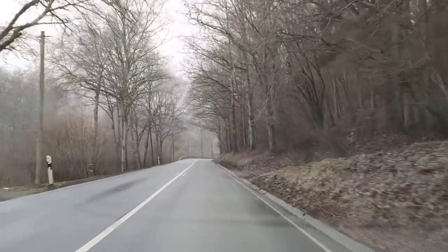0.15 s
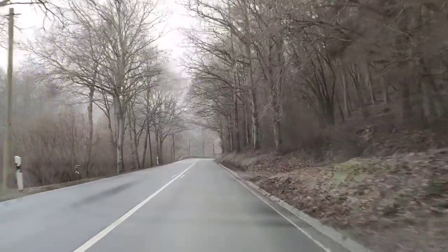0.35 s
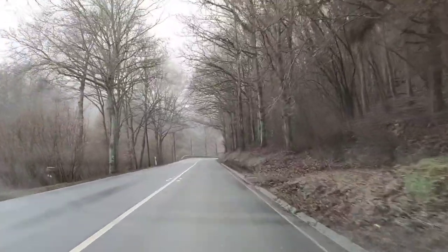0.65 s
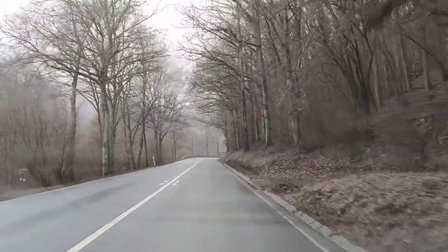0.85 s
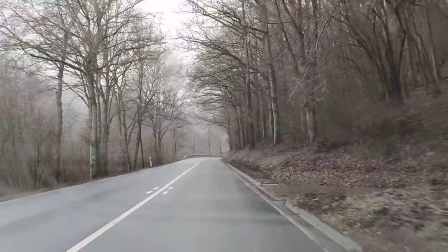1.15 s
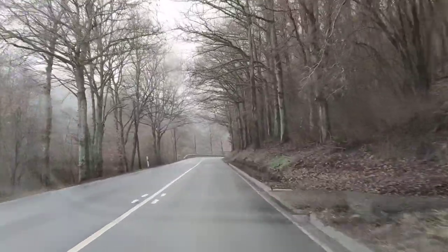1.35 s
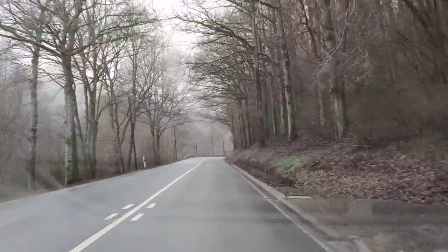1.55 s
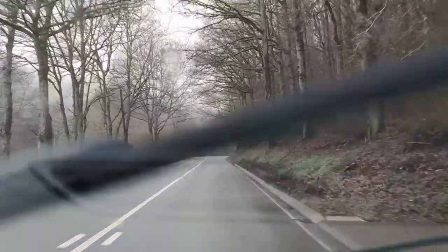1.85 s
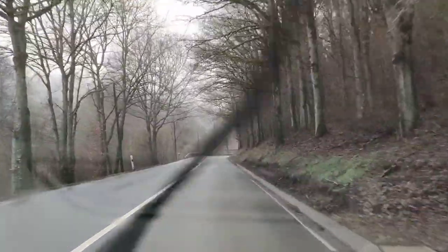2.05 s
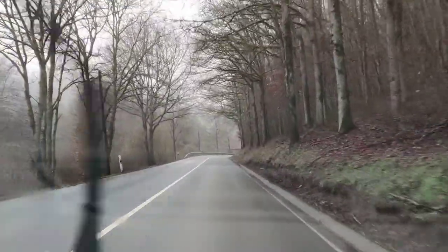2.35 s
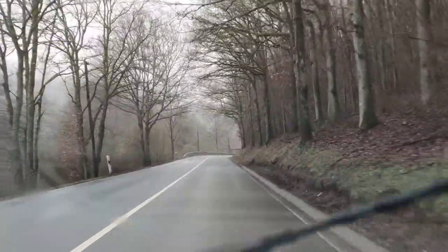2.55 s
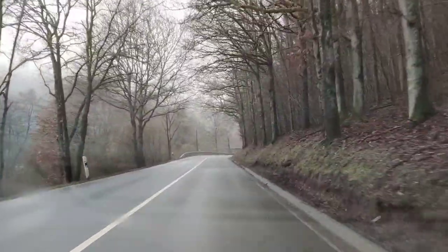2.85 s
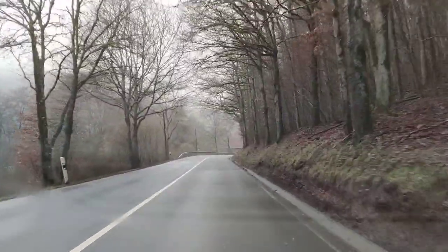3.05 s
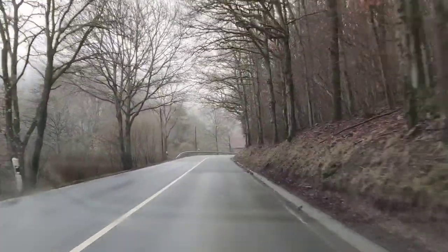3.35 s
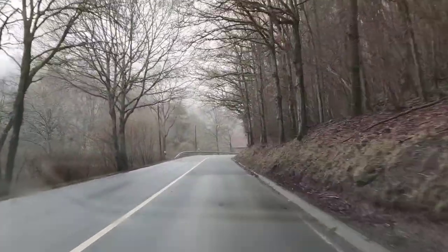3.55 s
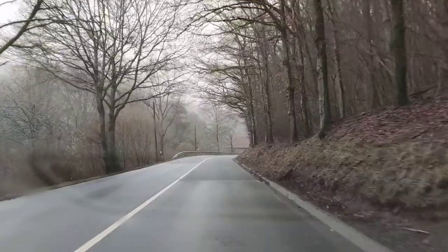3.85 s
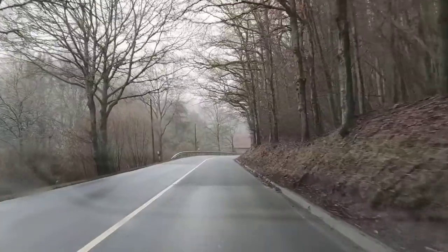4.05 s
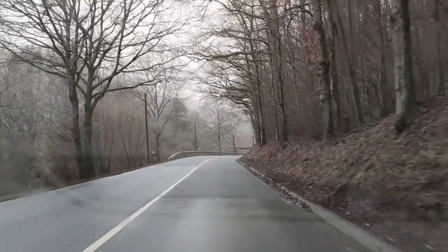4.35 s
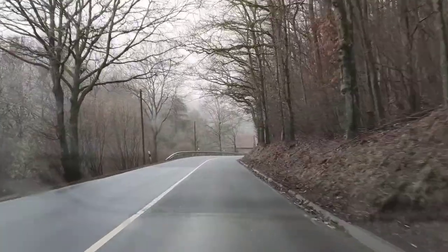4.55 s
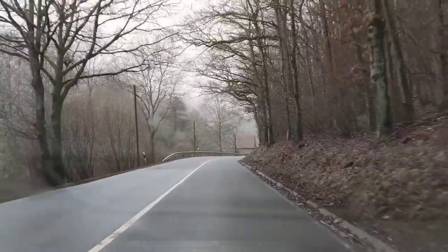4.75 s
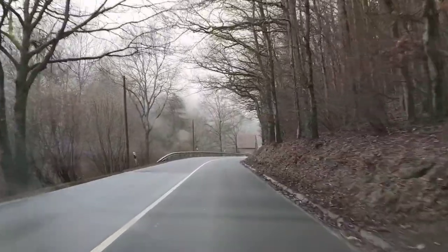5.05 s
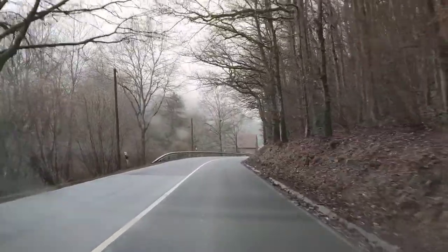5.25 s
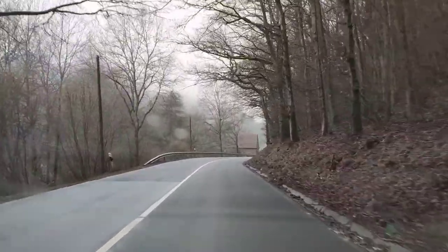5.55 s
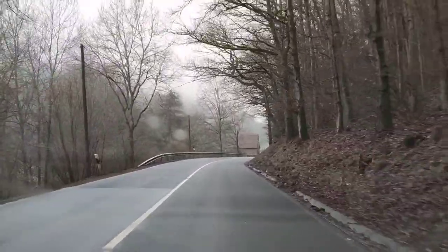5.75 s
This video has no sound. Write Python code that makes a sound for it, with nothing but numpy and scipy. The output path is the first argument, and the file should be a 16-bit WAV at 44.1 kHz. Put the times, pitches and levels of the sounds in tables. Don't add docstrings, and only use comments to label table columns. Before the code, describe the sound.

Inside a car on a wet country road: low engine hum, deep tyre roar, faint spray hiss, one wiper sweep, keys jingling over a bump.

```python
import sys
import numpy as np
from scipy import signal
from scipy.fft import rfft, irfft, next_fast_len
from scipy.io import wavfile
from scipy.ndimage import uniform_filter1d

SR = 44100
rng = np.random.default_rng(int(sys.argv[2]) if len(sys.argv) > 2 else 0)


def inscribe(sig):
    pcm = np.round(np.clip(np.atleast_2d(sig).T, -1, 1) * 32767)
    wavfile.write(sys.argv[1], SR, pcm.astype(np.int16))


def gain_from_db(level_db):
    decades = np.asarray(level_db, float) / 20
    return 10 ** decades


N = 259749


def evened(x):
    return x / np.sqrt(np.mean(x ** 2) + 1e-20)


def read(points, hz):
    f, value = np.transpose(points)
    return np.interp(np.log(hz + 1), np.log(f + 1), value)


def curves(rows):
    s, *columns = np.transpose(rows)
    return [np.interp(np.arange(N) / SR, s, c) for c in columns]


def add(mix, s, sound):
    part = mix[:, round(s * SR):][:, :sound.shape[1]]
    part += sound[:, :part.shape[1]]


def band(x, lo_hz, hi_hz):
    edges_hz = [max(lo_hz, 5), min(hi_hz, SR / 2.1)]
    return signal.sosfilt(signal.butter(3, edges_hz, "bandpass", fs=SR, output="sos"), x)


def wander(rate_hz):
    knots = rng.standard_normal(400)
    return np.interp(np.arange(N) / SR * rate_hz, np.arange(len(knots)), knots)


def swells(times, half_s):
    t = np.arange(0, N + 64, 64) / SR
    return np.exp(-((t - np.reshape(times, (-1, 1))) / np.reshape(half_s, (-1, 1))) ** 2)


def fine(steps):
    return np.interp(np.arange(N) / 64, np.arange(len(steps)), steps)


def puffs(rows):
    out, t = np.zeros((2, N)), np.arange(9000) / SR
    for s, db, lo_hz, hi_hz, t60, alike in rows:
        common, left, right = rng.standard_normal((3, len(t)))
        burst = (alike * common + (1 - alike) * np.array([left, right])) * gain_from_db(-60 * t / t60)
        passed = np.sqrt((hi_hz - lo_hz) / (SR / 2))
        add(out, s, gain_from_db(db + 1.0) / passed * band(burst, lo_hz, hi_hz))
    return out


# frequency_hz, likeness [-1 to 1]
PORT_LIKENESS = [(60, 0.94), (130, 0.87), (290, 0.71), (640, 0.14), (1410, -0.12), (3100, 0.059),
                 (6820, -0.038), (15000, -0.52)]


def noise(spectrum, size, patchy_db):
    hop, hz = size // 4, np.fft.rfftfreq(size, 1 / SR)
    a, b, c, d, patches = rng.standard_normal((N // hop + 5, len(hz), 5)).T
    patches = uniform_filter1d(patches, size=10, axis=0)
    patches = evened(uniform_filter1d(patches, size=8, axis=1))
    same = np.clip(read(PORT_LIKENESS, hz), -1, 1)[:, None]
    left = a + 1j * b
    right = same * left + np.sqrt(1 - same ** 2) * (c + 1j * d)
    level_db = read(spectrum, hz)[:, None] + patchy_db * patches
    z = np.array([left, right]) * gain_from_db(level_db)
    return evened(signal.istft(z, nperseg=size, noverlap=size - hop)[1][:, :N])


# frequency_hz, density_db [dB per Hz]
ROAR_SPECTRUM = [(35, -39), (60, -1), (102, -8.5), (144, -8), (188, -11), (250, -15.5), (314, -17),
                 (400, -19), (470, -19.5), (555, -17.5), (640, -24), (800, -28.5), (974, -40), (1430, -74)]
# frequency_hz, density_db [dB per Hz]
HISS_SPECTRUM = [(530, -25), (900, -2.5), (1040, -4), (1150, -3), (1880, -5), (2300, -5.5), (2950, -8),
                 (3600, -14.5), (4300, -18), (6100, -16.5), (7100, -25), (7900, -22), (8900, -34.5),
                 (12000, -36)]


def road():
    t = np.arange(N) / SR
    roar = noise(ROAR_SPECTRUM, size=4096, patchy_db=1.1)
    bass = signal.sosfilt(signal.butter(2, 170, fs=SR, output="sos"), roar)
    coarsen_db = 1.23 * (t - t.mean())
    roar = roar + bass * (gain_from_db(coarsen_db) - 1)
    hiss = noise(HISS_SPECTRUM, size=512, patchy_db=0.74)
    top = signal.sosfilt(signal.butter(2, 3800, "high", fs=SR, output="sos"), hiss)
    spray_db = np.exp(-t / 0.72) + 1.0 + 0.98 * wander(14)
    hiss = hiss + top * (gain_from_db(spray_db) - 1)
    return gain_from_db(-34.5) * roar + gain_from_db(-51.5) * hiss


# middle_s, half_length_s, rate [taps per second]
RUSTLES_OF_CLOTH = [
    (.03, .08, 550),
    (.17, .1, 650),
    (0.326, .06, 550),
    (5.468, .025, 300),
    (5.84, .055, 1300),
]


def drops():
    s, half_s, rate = np.transpose(RUSTLES_OF_CLOTH)
    per_s = 30 + fine(rate @ swells(s, half_s))
    size_db = 2.4 * np.minimum(rng.exponential(1, N), 4)
    hits = gain_from_db(size_db) * (rng.random(N) < per_s / SR)
    t = np.arange(700) / SR
    tap = band(rng.standard_normal((2, len(t))), 3500, 7600) * gain_from_db(-60 - 60 * t / 0.028)
    return signal.oaconvolve(hits[None], tap, axes=1)[:, :N]


# start_s, level_db [rms], centre_hz, width_hz, t60_s
TRIM_TICKS = [(0.148, -55, 5500, 2600, .1), (0.316, -61, 7900, 877, .1), (0.333, -59, 7900, 900, .1),
              (.35, -64, 8000, 900, .05), (.603, -61, 7500, 2450, .03), (.654, -66, 8200, 5000, 0.033),
              (.714, -56, 6300, 3400, 0.026), (1.63, -61, 6050, 8070, 0.039), (1.923, -57, 7700, 1200, .04),
              (2.745, -55, 5500, 3026, 0.043), (4.49, -52, 6885, 6004, 0.045),
              (5.787, -55.5, 8000, 9000, 0.044), (5.798, -59.5, 8160, 8180, .1),
              (5.82, -59, 6670, 6000, 0.062), (5.843, -50.5, 6830, 3000, 0.08),
              (5.871, -56.5, 9100, 11400, 0.093)]


def ticks():
    rows = []
    for s, db, hz, width, t60 in TRIM_TICKS:
        rows.append((s, db, max(hz - width / 2, 1500), hz + width / 2, t60, 0.4))
    return puffs(rows)


# start_s, level_db [rms], low_hz, high_hz, t60_s
REVERSAL_THUDS = [
    (1.65, -35, 150, 448, 0.21),
    (2.335, -27.5, 86.5, 169, 0.28),
    (2.402, -36, 90, 610, 0.069),
    (2.41, -23, 60, 148, 0.21),
]


def thuds():
    return puffs([(*row, 0.9) for row in REVERSAL_THUDS])


# start_s, level_db [peak], pitch_hz, t60_s
KNOCKS = [(1.622, -33.5, 860, 0.048), (1.623, -38, 1060, 0.037), (1.628, -22, 198, 0.12),
          (1.651, -22.5, 217, 0.078), (1.689, -36, 131, 0.13), (2.344, -20, 148.4, 0.11),
          (2.403, -21, 248, 0.045), (2.402, -27, 381, 0.058), (2.405, -30, 520, 0.028),
          (2.417, -23, 52, 0.092), (5.32, -20.5, 157, 0.13), (5.47, -14, 74, 0.36)]


def wiper():
    out, t = np.zeros((2, N)), np.arange(9000) / SR
    for s, db, hz, t60 in KNOCKS:
        onset = 1 - np.exp(-t * hz / 0.5)
        ring = gain_from_db(db - 60 * t / t60) * np.sin(2 * np.pi * hz * t) * onset
        add(out, s, ring * np.ones((2, 1)))
    return out


def motor():
    t = np.arange(N) / SR
    from_s, to_s = 1.75, 3.2
    done = np.clip((t - from_s) / (to_s - from_s), 0, 1)
    hz = 410 - 17 * np.sin(np.pi * done)
    db = -62.5 + 12 * abs(np.sin(2 * np.pi * done)) + 5.0 * wander(9.9)
    running = np.clip(np.minimum(t - from_s, to_s - t) / 0.039, 0, 1)
    return np.sqrt(2) * running * gain_from_db(db) * np.sin(2 * np.pi * np.cumsum(hz) / SR)


# pitch_hz, level_db, t60_s
KEY_MODES = [(5600, -15, .07), (7500, -6, 0.044), (7900, 0, 0.046), (10800, -11, 0.035), (7700, 8.5, 0.043),
             (10300, -10, 0.051), (11170, -2, .05), (11500, -5.5, .04), (11900, -7, .05), (12630, -9, .048),
             (13370, 1.5, .055), (13590, 1.5, .055), (14160, -19, .04), (14620, -16, .02)]
# start_s, blow_db, tilt_db [dB per octave], scrape [share 0-1]
CLASHES = [
    (4.469, -72, 3.5, .7),
    (5.321, -50.5, -1.5, 0.2),
    (5.326, -57, 2.5, .3),
    (5.341, -55, 0, 0.4),
    (5.35, -61.5, -5, 0.3),
    (5.36, -47.5, -0.5, 0.3),
    (5.494, -58.5, -10, 0.55),
    (5.505, -67, -4, .7),
]


def keys():
    out, t = np.zeros((2, N)), np.arange(5000) / SR
    hz, mode_db, t60 = (c[:, None] for c in np.transpose(KEY_MODES))
    for s, db, tilt_db, scrape in CLASHES:
        luck = rng.standard_normal((len(KEY_MODES), 4))
        level_db = db + mode_db + tilt_db * np.log2(hz / 10000) + 2 * luck[:, :1]
        rattle = rng.standard_normal((len(KEY_MODES), len(t)))
        chatter = 1 + 0.58 * evened(uniform_filter1d(rattle, size=90))
        decay = chatter * gain_from_db(level_db - 60 * t / t60)
        detuned_hz = hz * (1 + 0.003 * luck[:, 1:2])
        fizz_db = db + 3.0 - 60 * t / 0.055 + 5.5 * np.exp(-t / 0.0025)
        share = np.clip(scrape, 0, 1)
        for ch, side_db in enumerate((-2.5, 2.5)):
            phase = 3 * luck[:, 2 + ch:3 + ch]
            rings = decay * np.sin(2 * np.pi * detuned_hz * t + phase)
            fizz = gain_from_db(fizz_db) * evened(band(rng.standard_normal(len(t)), 9500, 15600))
            clash = (1 - share) * rings.sum(0) + share * fizz
            onset = np.minimum(t / 0.0007, 1)
            add(out[ch:ch + 1], s, gain_from_db(side_db) * (onset * clash)[None])
    return out


# peak_s, level_db
ROAD_DIPS = [(0, -21), (.12, -33), (.48, -26.5), (.73, -28.5), (1.17, -22), (1.39, -26), (1.71, -24),
             (2.06, -24), (2.28, -34.5), (2.66, -31.5), (3.03, -26), (3.21, -29), (3.74, -44), (4.03, -32),
             (4.33, -27.5), (4.8, -31), (5.02, -29), (5.3, -33), (5.49, -16.5)]


def suspension():
    s, db = np.transpose(ROAD_DIPS)
    swing = fine(np.sqrt(gain_from_db(2 * db) @ swells(s, 0.057) + gain_from_db(2 * -36)))
    shake = evened(band(rng.standard_normal(N), 19.0, 31.9))
    shake = shake / (0.34 + uniform_filter1d(abs(shake), size=4000))
    return swing * evened(shake)


# peak_s, level_db, pitch_hz
ROAD_BUMPS = [(.38, -27.5, 40), (0.539, -24.5, 37), (.71, -20.5, 37), (0.851, -26, 38), (1.09, -20, 39.6),
              (1.54, -28, 42.6), (1.89, -24, 40.04), (2.07, -30, 35.7), (2.17, -28, 34.7),
              (2.42, -22.5, 40.5), (3.03, -30.5, 30.42), (3.23, -24, 29.56), (3.33, -25, 31.1),
              (3.74, -32, 36.3), (3.87, -29.5, 42), (4.03, -31, 39.8), (4.21, -28.5, 38), (4.33, -24.5, 37),
              (4.52, -15, 37.05), (4.64, -19.5, 37), (4.781, -21.5, 37), (4.87, -20.5, 37),
              (4.95, -22.5, 37), (5.02, -21.5, 37), (5.13, -21, 37), (5.26, -25, 37), (5.36, -19.5, 37.1),
              (5.49, -22, 36.5), (5.8, -26.5, 42.7)]


def body():
    s, db, hz = np.transpose(ROAD_BUMPS)
    bumps = gain_from_db(2 * db)[:, None] * swells(s, 0.035)
    t = np.linspace(0, N / SR, bumps.shape[1])
    ribs = np.clip(np.minimum(t - 4.4, 5.58 - t) / 0.08, 0, 1) * gain_from_db(-33.5)
    calm = gain_from_db(2 * -37) + 0 * t
    power = np.vstack([bumps, ribs ** 2, calm])
    total = power.sum(0)
    boom = fine(np.sqrt(total))
    boom_hz = fine(np.append(hz, [37, 38]) @ power / total)
    ring = np.sqrt(2) * np.sin(2 * np.pi * np.cumsum(boom_hz) / SR)
    rough = evened(band(rng.standard_normal(N), 36.9, 55.9))
    shudder = gain_from_db(-31.0) * evened(boom) ** 0.49 * rough
    return boom * ring + shudder


# order [multiple of wheel rate], level_db
WHEEL_ORDERS = [(10, -46), (11, -48), (16, -46), (27, -53), (29, -48), (30, -60), (31, -53), (32, -49),
                (33, -57), (34, -61), (40, -58), (43, -62), (58, -64), (64, -61), (65, -56), (66, -57),
                (67, -57), (68, -66), (69, -61), (70, -67), (71, -65), (72, -63), (73, -66), (74, -64),
                (76, -68), (77, -68), (78, -70), (79, -71), (80, -72), (89, -75)]
# pitch_hz, width_hz, lift_db
AIR_RING = [
    (236.3, 20, 13),
    (264.2, 15, 9),
]


def tyres():
    turns_per_firing = 0.1498
    wheel_hz = curves(ENGINE_RUN)[0] * turns_per_firing
    angle = 2 * np.pi * np.cumsum(wheel_hz) / SR
    out = np.zeros((2, N))
    for k, db in WHEEL_ORDERS:
        start, side = rng.uniform(0, 2 * np.pi), rng.choice([-1, 1])
        likeness = np.clip(read(PORT_LIKENESS, k * wheel_hz.mean()), -1, 1)
        lag = side * np.arccos(likeness) / 2
        lift_db = 0
        for hz, width, top_db in AIR_RING:
            lift_db = lift_db + top_db / (1 + (2 * (k * wheel_hz - hz) / width) ** 2)
        wave = np.sin(k * angle + start + 0.32 * wander(2.65) + np.array([[lag], [-lag]]))
        out += gain_from_db(db + 2.7 * wander(2.98)) * evened(gain_from_db(lift_db)) * wave / np.cos(lag)
    return np.sqrt(2) * gain_from_db(-0.3) * out


# time_s, firing_hz, level_db [firing tone, follows the load]
ENGINE_RUN = [
    (0.0, 57.25, -23),
    (0.8, 57.55, -23.5),
    (1.4, 57.51, -27),
    (2.5, 56.59, -29.5),
    (3.3, 55.6, -34),
    (3.8, 55.48, -43),
    (4.2, 54.96, -33.5),
    (4.7, 54.63, -43),
    (5.5, 53.9, -41),
    (5.89, 53.53, -27),
]


def engine():
    hz, first_db = curves(ENGINE_RUN)
    angle = 2 * np.pi * np.cumsum(hz) / SR
    first = gain_from_db(first_db + 2.4 * wander(6.31)) * np.sin(angle)
    second = gain_from_db(-44 + 3 * wander(2.4)) * np.sin(2 * angle + 1)
    fourth = gain_from_db(-54.5 + 3 * wander(5)) * np.sin(4 * angle + 2)
    return np.sqrt(2) * (first + second + fourth)


def scene():
    outside = road() + drops()
    fittings = ticks() + thuds() + wiper() + motor() + keys()
    return outside + fittings + suspension() + body() + tyres() + engine()


def band_limit(x):
    return signal.sosfilt(signal.butter(12, 16390, fs=SR, output="sos"), x)


# frequency_hz, difference_db [left minus right]
PORT_DIFFERENCE = [(60, .5), (800, 0.5), (1800, -1.5), (2700, -3.5), (4200, -6), (5400, -12), (6300, -13),
                   (6900, -5.5), (7300, 5), (7900, 17), (8800, 10.5), (10000, 0.5), (15000, -8)]


def record(dry):
    size = next_fast_len(N + 4096)
    hz = np.fft.rfftfreq(size, 1 / SR)
    lean_db = read(PORT_DIFFERENCE, hz) / 2
    gains = gain_from_db(np.array([lean_db, -lean_db]))
    gains = gains / np.sqrt((gains ** 2).mean(0))
    own_hiss = gain_from_db(np.array([[-73], [-72]])) * rng.standard_normal(dry.shape)
    spectrum = rfft(dry, size) * gains + rfft(own_hiss, size)
    heard = irfft(spectrum * (hz < 15750), size)[:, :N]
    return band_limit(heard)


dry = scene()
out = record(dry)
inscribe(out)
```